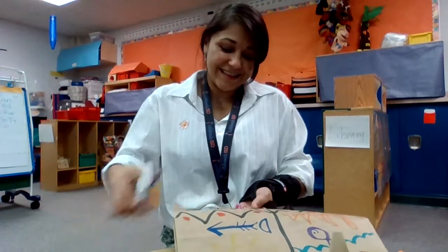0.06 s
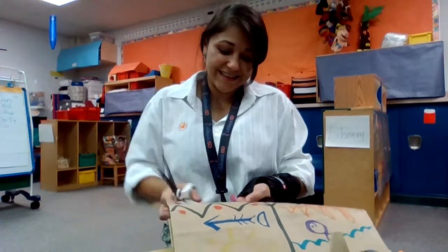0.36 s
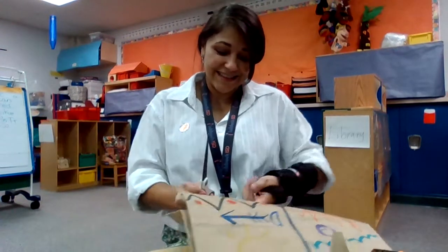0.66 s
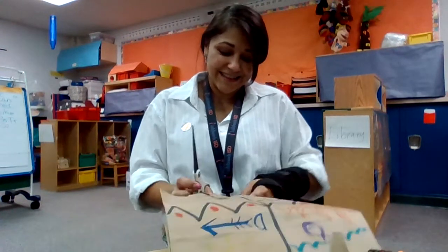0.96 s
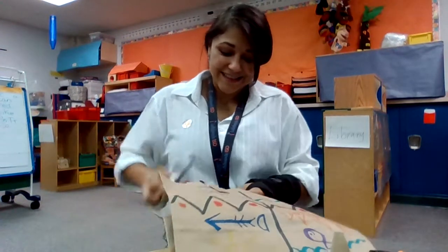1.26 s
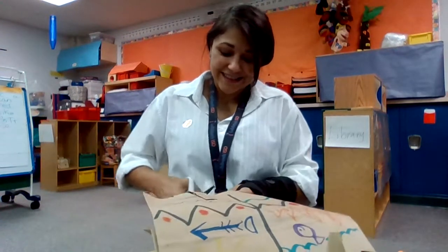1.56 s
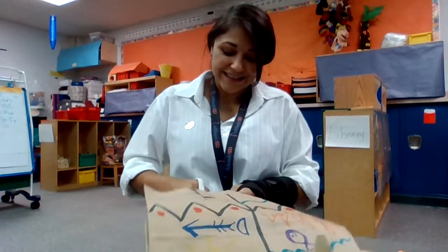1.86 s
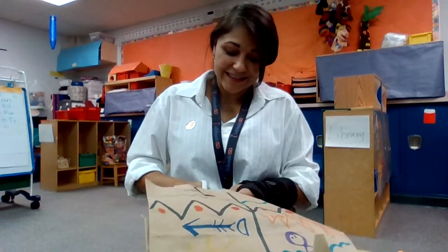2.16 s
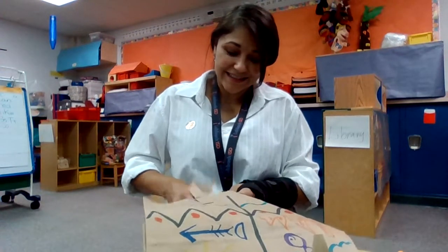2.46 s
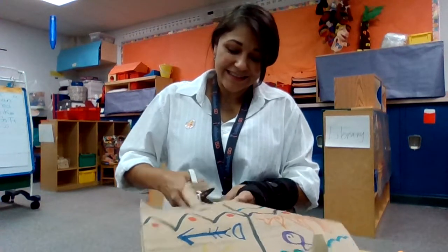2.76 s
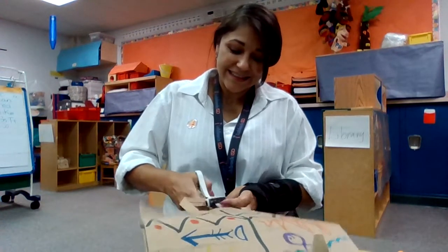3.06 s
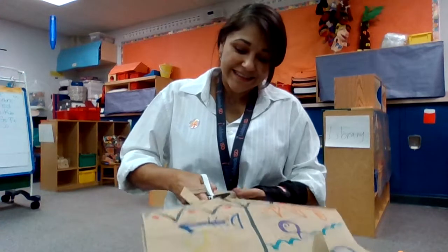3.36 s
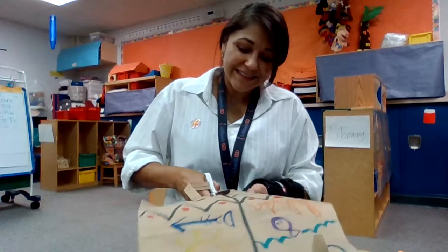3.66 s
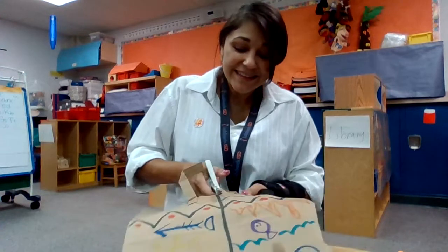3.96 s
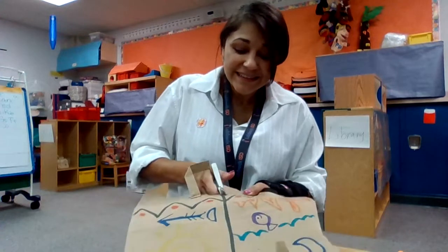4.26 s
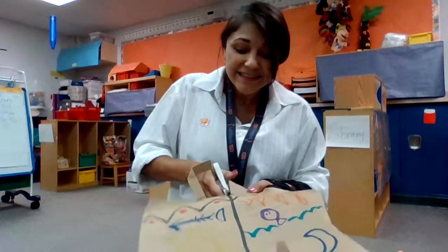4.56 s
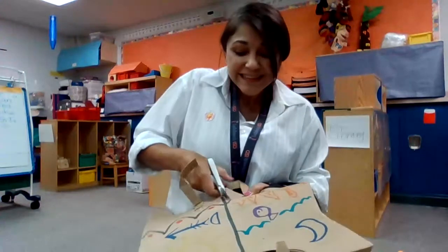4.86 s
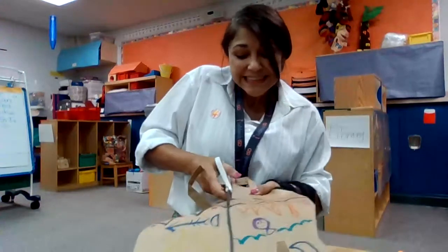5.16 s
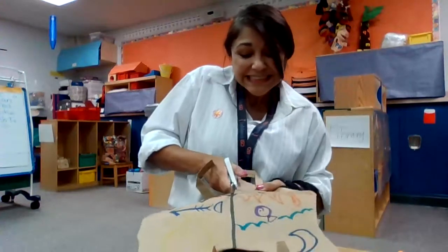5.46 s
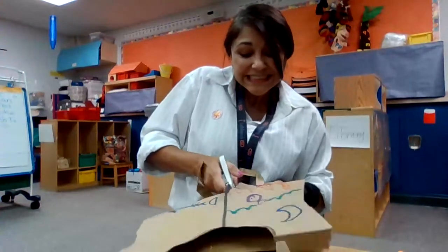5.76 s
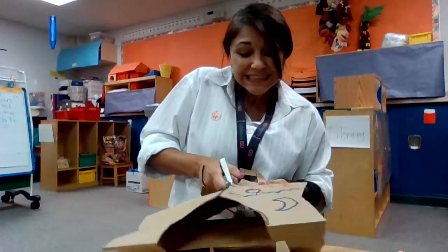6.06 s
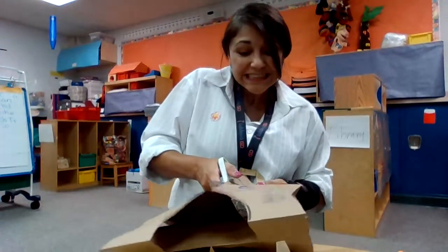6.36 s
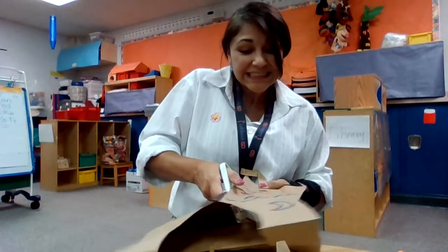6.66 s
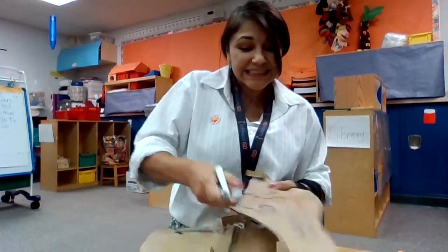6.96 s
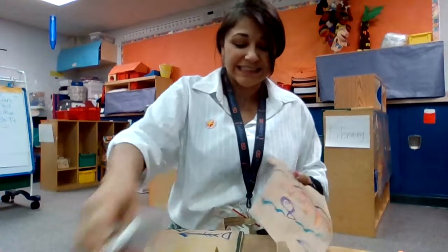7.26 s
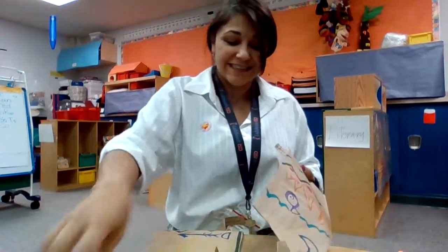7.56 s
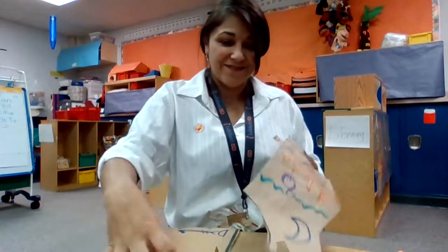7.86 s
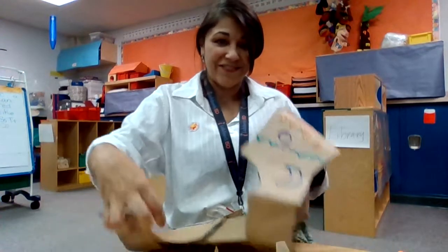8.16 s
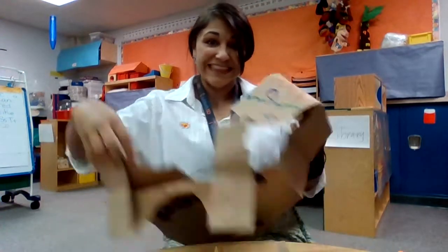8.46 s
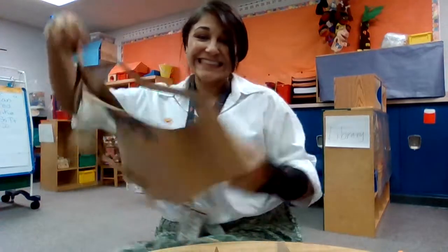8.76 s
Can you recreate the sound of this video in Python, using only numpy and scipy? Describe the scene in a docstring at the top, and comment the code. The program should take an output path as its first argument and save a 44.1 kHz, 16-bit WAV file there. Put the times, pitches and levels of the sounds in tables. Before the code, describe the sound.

A stiff paper bag rustles close to the microphone, sliding, crinkling and buckling with dull pops as it is turned. Scissors cut into it in a run of crunchy, hissing squeezes with sharp snips. They then drop onto a wooden table and bounce with a brief steel ring, and the bag is lifted with a few sharp crackles. Ventilation hums faintly in the quiet classroom.

```python
"""A stiff paper bag rustles close to the microphone in a quiet, carpeted classroom.
As it is turned the paper slides, its creases crinkle and snap, and its panels buckle with dull pops.
Scissors cut in, each squeeze breaking a dense run of fibres, then drop and bounce on the table,
ringing wood and steel. The bag is lifted with a few sharp creases. Ventilation hums faintly behind."""
import sys
import numpy as np
from scipy import signal
from scipy.fft import rfft, irfft
from scipy.io import wavfile

SR = 44100
rng = np.random.default_rng(int(sys.argv[2]) if len(sys.argv) > 2 else 0)


def generate_wav(sig):
    """Save sig (samples, or channels by samples) to the path in sys.argv[1] as 16-bit PCM at SR."""
    pcm = np.round(np.clip(np.atleast_2d(sig).T, -1, 1) * 32767).astype(np.int16)
    wavfile.write(sys.argv[1], SR, pcm)


N = 388080
TIME = np.arange(N) / SR

# room tone: the air's spectrum and the ventilation's tones (frequency [Hz], level [dB])
ROOM_AIR = [(15, -8), (25, 0), (93, 6), (188, -4), (253, 2.5), (421, -9.5), (482, -19), (895, -13),
            (1270, -6), (1660, -8), (3720, -12), (7700, -9.5), (15500, -16)]
VENT_HUM = [(118, -77.5), (240, -79), (415, -80)]
# hard surfaces near the microphone (delay [s], strength [ratio])
NEAR_ECHOES = [(.00085, 0.074), (.0021, -0.055), (.0034, .15), (0.0103, 0.2)]
# faint tones lingering after some contacts (time [s], frequency [Hz], level [dB], t60 [s])
RINGS = [(0.0, 495, -57, 0.41), (3.453, 481, -44, 2.8), (3.457, 1243, -47, 4.7), (4.207, 351, -48.5, 1.6),
         (4.791, 353, -47, 1.4), (7.391, 1296, -49, 0.48)]
# low thuds on the table, from the bag and once from the scissors (time [s], level [dB], centre [Hz])
LOW_THUDS = [(2.091, -41, 130), (2.122, -42.5, 150), (3.057, -48.5, 139), (3.56, -45.5, 160),
             (4.02, -38.5, 146), (4.797, -47, 150), (7.13, -34, 126)]

# scissors landing on the table (time [s], crack level [dB], thud level [dB])
BOUNCES = [(7.129, -4, -6.5), (7.131, -4.5, -15), (7.158, -11, -10.5), (7.173, -18, -9.5), (7.253, -4, -8),
           (7.267, -6, -3.5), (7.27, -10, -8.5), (7.281, -13.5, -29), (7.3089, -5, -9.5), (7.315, -19, -21),
           (7.319, -18, -9.5), (7.327, -7.5, -19), (7.341, -24, -17), (7.351, -12, -14),
           (7.362, -18, -10.5), (7.374, -23, -19), (7.3831, -17, -12.5), (7.405, -25, -14.5)]
# the wooden table's thud with two high steel rings (frequency [Hz], level [dB], t60 [s])
LANDING_MODES = [(111.5, -31.5, 0.48), (140, -27.5, 0.36), (184.3, -33, 0.27), (425, -25.5, 0.085),
                 (560, -23, 0.056), (639, -11, 0.048), (1079, -23, 0.19), (1314, -11, 0.049),
                 (1813, -12.5, 0.047), (1910, -19.5, 0.13), (2150, -10, 0.018), (3380, -19, 0.011),
                 (4600, -22, 0.092), (5430, -37.5, 0.11)]
# the steel blades ringing (frequency [Hz], level [dB], t60 [s])
BLADE_MODES = [(1101, -26.5, 0.17), (2070, -20, 0.049), (3270, -34, 0.08), (4150, -18, 0.043),
               (4700, -29.5, 0.043), (5850, -18, 0.038), (6130, -42, 0.027), (8500, -23, 0.031)]
# scissors rocking to rest (time [s], level [dB], centre [Hz], t60 [s])
SETTLING = (7.385, -27.5, 674, 0.26)

# spectra of the paper, heard close up (frequency [Hz], level [dB])
SLIDE = [(2500, -21), (4200, -8), (5500, -1), (7600, 0), (9500, -1), (12000, -6), (15500, -14.5)]
CRINKLE = [(1000, -17.5), (1650, 1.5), (2100, 4), (2600, 3.5), (3100, 4.5), (4300, 0), (5500, 0.5),
           (9000, -60)]
PANEL = [(300, -24), (450, -12), (640, -3), (850, 5), (1020, 1), (1220, -1.5), (1550, -4), (2400, -22)]
BILLOW = [(30, -16.5), (70, -17), (115, -7), (180, -2), (260, -1.5), (360, 6.5), (520, 5.5), (800, -25.5),
          (1500, -7.5)]
FIBRES = [(2500, -29), (4200, -6.5), (5500, 4), (7400, 7.5), (9500, 4), (12000, 2), (15500, -22.5)]
SIZZLE = [(6000, -9), (9000, -5.5), (12000, 9.5), (14500, 4), (15800, -14.5)]
# panels buckling (time [s], level [dB], pitch [Hz])
POPS = [(.275, -30.5, 1425), (.536, -23, 1360), (.55, -23, 1300), (0.725, -32, 975), (2.088, -18, 746),
        (2.11, -21, 1290), (2.272, -28.5, 860), (2.411, -40, 655), (2.594, -29, 790), (2.688, -41, 734),
        (2.885, -36.5, 880), (3.064, -21, 934), (3.274, -29, 565), (3.457, -26, 1250), (3.906, -13, 927),
        (4.036, -8.5, 1053), (4.076, -11.5, 976), (4.206, -22, 947), (4.33, -32.5, 930), (4.583, -30, 870),
        (4.631, -21, 980), (4.662, -18.5, 1140), (4.815, -15.5, 860), (4.917, -29, 1020),
        (5.075, -22, 1170), (5.143, -22, 970), (6.156, -14, 1490), (6.162, -20.5, 680), (6.552, -14, 1484),
        (6.815, -37, 880), (6.886, -33, 1434), (6.98, -19.5, 1430), (7.038, -40.5, 1440), (7.631, -33, 694),
        (7.676, -27, 1320), (8.008, -30, 1330), (8.203, -30, 1090), (8.215, -37, 250), (8.496, -24, 796),
        (8.504, -18, 430), (8.707, -41, 990)]
# creases and closing blades snapping (time [s], level [dB], centre [Hz])
SNAPS = [(.117, -30.5, 6350), (1.6667, -13, 7200), (2.0601, -14, 9500), (2.0867, -23, 5660),
         (2.1096, -18, 2010), (2.1263, -9, 1830), (3.133, -21.5, 7870), (3.2536, -15.5, 1920),
         (3.947, -14, 7060), (4.02, -11.5, 5300), (4.0345, -7.5, 2440), (4.0743, -1.5, 5150),
         (4.0866, -12.5, 6030), (4.367, -28.5, 3060), (4.4738, -22, 1910), (4.583, -18, 6300),
         (4.6279, -15.5, 2390), (4.659, -15.5, 2650), (4.839, -16.5, 5580), (5.143, -4, 4600),
         (5.526, -14.5, 7860), (5.251, -10, 7300), (5.7382, -9, 3400), (5.7806, -3, 2680),
         (5.7808, -7.5, 6300), (5.947, 0, 6700), (6.003, -14, 2300), (6.226, -3, 4200), (6.2424, -4, 7040),
         (6.446, -12, 5330), (6.5155, 3.5, 5500), (6.5565, 0, 8200), (6.6322, -13.5, 2980),
         (6.655, -12.5, 2840), (6.7413, -22.5, 5100), (6.9344, -20, 3030), (6.949, -18, 1700),
         (6.958, -18, 3620), (6.98, -14, 2640), (7.7125, -22.5, 6160), (8.0083, -19, 3550),
         (8.0675, -18.5, 4300), (8.201, -1, 4970), (8.2015, -15.5, 6030), (8.2045, -7.5, 2360),
         (8.4598, -5, 2260), (8.495, -16, 2380), (8.7022, -19, 3570)]
# faint rustle of the held bag (time [s], level [dB])
HOLDING = [(0, -70), (.25, -51), (.8, -62.5), (1.05, -63.5), (1.2, -65), (1.4, -72), (1.85, -68),
           (2.4, -66.5), (2.7, -52.5), (3.7, -58.5), (4.5, -52.5), (5.0, -60), (6.3, -76), (6.8, -57),
           (7.05, -79), (7.7, -54), (8.35, -69.5), (8.8, -59.5)]
# offsets of that rustle's layers (slide [dB], crinkle [dB], panel [dB], billow [dB])
HOLDING_COLOUR = [-0.5, -9.5, -9.5, -13.5]
# pushes and turns of the bag
# (time [s], swell [s], fade [s], slide [dB], crinkle [dB], panel [dB], billow [dB])
STROKES = [ (.108, 0.016, 0.11, -53, -62, -62, -70), (0.271, 0.15, 0.077, -35, -47.5, -56.5, -68),
           (.505, 0.072, 0.023, -70, -64.5, -37, -52), (0.607, 0.097, 0.074, -30, -39, -56.5, -65),
           (.79, 0.049, 0.018, -48.5, -68.5, -59, -66), (1.295, .008, 0.014, -54, -73, -86, -85),
           (0.964, 0.023, 0.032, -51.5, -56, -48.5, -51), (1.458, 0.056, 0.059, -50, -52.5, -53.5, -85),
           (1.48, 0.1, 0.15, -41, -57.5, -82, -84), (1.635, 0.019, 0.052, -33.5, -48, -60, -66),
           (1.841, 0.057, 0.012, -48.5, -48.5, -42, -72), (1.93, 0.047, 0.13, -52, -56, -61, -78),
           (2.048, 0.021, 0.034, -33, -81, -42, -65), (2.075, 0.018, 0.084, -30.5, -40.5, -31.5, -41.5),
           (2.102, 0.023, .035, -34, -37, -31, -38), (2.136, 0.073, 0.036, -40.5, -42, -46.5, -78),
           (2.24, 0.018, 0.12, -46, -56, -56, -73), (2.43, .08, 0.19, -48.5, -55, -59.5, -81),
           (2.558, 0.052, 0.064, -37.5, -42.5, -49.5, -79), (2.65, 0.11, 0.028, -40, -43, -59, -78),
           (2.769, 0.094, 0.18, -42.5, -43, -60, -81), (2.988, 0.076, 0.07, -40.5, -45, -38, -47.5),
           (3.08, .075, 0.08, -41, -63.5, -74, -71), (3.168, 0.079, 0.039, -31.5, -39.5, -42, -48.5),
           (3.252, 0.042, 0.076, -59, -46.5, -36.5, -38), (3.331, 0.057, 0.17, -41, -51, -52, -57),
           (3.447, 0.13, 0.084, -21, -31, -33.5, -38.5), (3.58, 0.068, 0.069, -34, -36.5, -37.5, -41),
           (3.70, 0.084, 0.035, -49, -55.5, -53, -60), (4.068, 0.023, 0.066, -43, -38, -55, -51),
           (4.178, 0.066, 0.063, -38, -49.5, -45.5, -58), (4.31, 0.07, 0.15, -44, -46.5, -49.5, -51),
           (4.44, 0.076, 0.044, -56, -49.5, -41, -48), (4.573, 0.03, 0.16, -50, -42, -41, -63),
           (4.67, 0.14, 0.066, -25.5, -34.5, -33.5, -50), (4.884, 0.046, 0.082, -44.5, -52.5, -45, -55),
           (5.428, .095, 0.049, -31.5, -49, -45.5, -60), (6.586, 0.058, 0.087, -40, -41, -35.5, -50.5),
           (6.717, 0.023, 0.095, -40.5, -42.5, -51, -48), (6.939, .026, 0.049, -44, -29, -28, -40),
           (7.113, .003, .04, -27, -43, -52, -49), (7.50, 0.067, 0.056, -43, -53, -62, -53),
           (7.62, 0.062, 0.043, -51.5, -53, -50, -49.5), (7.725, 0.059, 0.067, -42.5, -71, -69, -65.5),
           (7.896, 0.016, 0.068, -48, -69, -72, -83), (7.988, 0.026, 0.053, -36, -38, -42.5, -51),
           (8.041, 0.028, 0.21, -49, -44.5, -41, -50.5), (8.183, 0.013, 0.098, -39.5, -32.5, -34, -35.5),
           (8.388, 0.072, 0.12, -38, -39, -42.5, -45), (8.484, 0.019, 0.024, -48, -36.5, -35, -31),
           (8.688, 0.016, 0.085, -55, -38.5, -44, -44), (8.70, 0.09, 0.069, -38, -41, -52, -60)]
# squeezes of the blades
# (time [s], bite [s], length [s], hiss [dB], sizzle [dB], crunch [dB], panel [dB])
SQUEEZES = [ (3.85, 0.035, 0.061, -26.5, -38, -30.5, -34), (3.941, 0.008, 0.045, -27, -43, -29.5, -28),
            (4.003, 0.018, 0.031, -28, -40, -29, -27), (5.037, 0.068, .06, -32, -41, -36, -37),
            (5.105, 0.019, 0.088, -30.5, -39, -33.5, -34), (5.202, 0.024, 0.042, -24.5, -34, -31.5, -36),
            (5.307, 0.058, 0.13, -24, -33, -34.5, -39), (5.603, 0.044, 0.13, -20.5, -24.5, -33, -41.5),
            (5.711, 0.0089, 0.074, -34, -47, -33.5, -36.5), (5.869, 0.043, 0.11, -19, -35, -29, -35.5),
            (5.973, 0.031, 0.06, -30.5, -51, -38.5, -42), (6.053, 0.07, 0.1, -18, -31, -28, -35.5),
            (6.199, 0.018, 0.071, -21, -35, -32.5, -37.5), (6.362, 0.18, 0.12, -16.5, -24.5, -27, -37),
            (6.504, 0.01, 0.069, -26, -35, -30.5, -39)]


def from_db(db):
    """Decibels to gain."""
    return 10 ** (np.asarray(db) / 20)


def unit_power(x):
    """Scale to unit power."""
    return x / np.sqrt(np.mean(x ** 2) + 1e-20)


def add(track, time, sound):
    """Mix a sound in at a time in seconds."""
    start = max(int(time * SR), 0)
    track[start:start + len(sound)] += sound[:N - start]


def drift(rate_hz):
    """Smooth random wander with spread 1."""
    step, run_in = 20, 2000   # samples per point; points skipped
    pole = np.exp(-2 * np.pi * rate_hz * step / SR)
    noise = rng.standard_normal(N // step + run_in + 2)
    slow = signal.lfilter([1], [1, -2 * pole, pole * pole], noise)[run_in:]
    return np.interp(np.arange(N) / step, np.arange(len(slow)), unit_power(slow))


def coloured(x, spectrum, size=2048):
    """Minimum-phase filter through the points of a spectrum; the result has unit power."""
    hz, db = np.transpose(spectrum)
    octave = np.log2(np.maximum(np.arange(size // 2 + 1) * SR / size, 10))
    octaves_outside = np.maximum(np.log2(hz[0]) - octave, 0) + np.maximum(octave - np.log2(hz[-1]), 0)
    gain = from_db(np.interp(octave, np.log2(hz), db) - 20 * octaves_outside)
    cepstrum = irfft(np.log(gain))
    causal = 2 * cepstrum[:size // 2] * (np.arange(size // 2) > 0)
    response = irfft(np.exp(rfft(causal, size)))
    return unit_power(signal.oaconvolve(x, response)[:N])


def resonance(x, hz, q):
    """Two-pole band-pass with gain 1 at its centre."""
    w = 2 * np.pi * min(hz, SR / 3) / SR
    damping = np.sin(w) / (2 * q)
    return signal.lfilter([damping, 0, -damping], [1 + damping, -2 * np.cos(w), 1 - damping], x)


def grains(per_s, spread_db, clump_db, clump_hz):
    """Tiny slips of uneven size that come in clumps; the power is the same at any density."""
    sizes = from_db(spread_db * np.minimum(rng.exponential(1, N), 4)) * rng.choice([-1, 1], N)
    slips = rng.random(N) < per_s / SR
    clumps = from_db(clump_db * np.clip(drift(clump_hz), -2, 2))
    return sizes * slips / np.sqrt(per_s) * clumps


def burst(hz, q, t60, tail_db, tail_t60, size=6000):
    """A sudden release: a spike, a fast decay in a steep-sided resonance and a weaker shiver."""
    t = TIME[:size]
    flutter = rng.choice([-1., 1.], size)
    fade = from_db(-60 * t / t60) + from_db(tail_db - 60 * t / tail_t60)
    spike = .09 * np.exp(-t / .00018)
    dying, steady = resonance(resonance([flutter * (fade + spike), flutter], hz, q), hz, q)
    return dying / np.std(steady)


def room_tone():
    """Quiet air and a slightly unsteady ventilation hum, behind everything else."""
    hum = sum(from_db(db) * np.sqrt(2) * np.sin(2 * np.pi * hz * TIME + drift(.73))
              for hz, db in VENT_HUM)
    return hum + from_db(-67) * coloured(rng.standard_normal(N), ROOM_AIR)


def classroom(x, tail_db, t60, wall_hz, size=26000):
    """The direct sound reaches the microphone first, then dull close reflections and a weak tail."""
    t = TIME[:size]
    tail = rng.standard_normal(size) * from_db(-60 * t / t60) * (t > .012)
    response = from_db(tail_db) * tail / np.linalg.norm(tail)
    for delay, strength in NEAR_ECHOES:
        response[int(delay * SR)] += strength
    response = signal.lfilter(*signal.butter(1, wall_hz, fs=SR), response)
    response[0] = 1   # direct path
    return signal.oaconvolve(x, response / np.linalg.norm(response))[:N]


def lingering_rings(size=45000):
    """Thin tones swell briefly, waver and die away."""
    out, t = np.zeros(N), TIME[:size]
    attack = 1 - np.exp(-t / .0052)
    taper = 1 - (t / t[-1]) ** 2
    for time, hz, db, t60 in RINGS:
        add(out, time, np.sin(2 * np.pi * hz * t) * from_db(db - 60 * t / t60) * attack * taper)
    return out * from_db(1.5 * drift(6))


def low_thuds():
    """Low thuds on the table, from the bag and once from the landing scissors."""
    out = np.zeros(N)
    for time, db, hz in LOW_THUDS:
        add(out, time, from_db(db) * burst(hz, q=1, t60=.19, tail_db=-5, tail_t60=.099, size=9000))
    return out


def settling_handles():
    """The handles rattle out against the wood in a short, hollow drone."""
    out = np.zeros(N)
    time, db, hz, t60 = SETTLING
    add(out, time, from_db(db) * burst(hz, q=3.8, t60=t60, tail_db=-37, tail_t60=.27, size=14000))
    return out


def ringing_blades(size=6000):
    """Every bounce sets the same steel modes ringing, each with a new strength."""
    out, t = np.zeros(N), TIME[:size]
    hz, mode_db, t60 = np.transpose(BLADE_MODES)[:, :, None]
    modes = np.sin(2 * np.pi * hz * t) * from_db(mode_db - 60 * t / t60)
    for time, crack_db, _ in BOUNCES:
        strengths = from_db(crack_db + .83 * rng.standard_normal(len(hz))) * rng.choice([-1, 1], len(hz))
        add(out, time, strengths @ modes)
    return out


def dropped_scissors(size=14000):
    """Each bounce cracks on a new spot, so wood and steel modes vary in strength and a little in pitch."""
    out, t = np.zeros(N), TIME[:size]
    hz, mode_db, t60 = np.transpose(LANDING_MODES)[:, :, None]
    for time, crack_db, thud_db in BOUNCES:
        detune = 1 + .025 * rng.standard_normal(hz.shape)
        modes = np.sin(2 * np.pi * hz * detune * t) * from_db(mode_db - 60 * t / t60)
        strengths = from_db(2 * rng.standard_normal(len(hz))) * rng.choice([-1, 1], len(hz))
        crack = burst(hz=4870, q=.66, t60=.011, tail_db=-25, tail_t60=.26, size=size)
        knock = burst(hz=1100, q=.35, t60=.02, tail_db=-20, tail_t60=.2, size=size)
        thud = strengths @ modes + from_db(-8.5) * knock
        add(out, time, from_db(crack_db - 4.5) * crack + from_db(thud_db - 3.5) * thud)
    return out


def flexing_walls(x, depth, paths=7):
    """Sound bounces inside the bag; as its walls bend, the paths change and the hollow colour shifts."""
    out, now = x.copy(), np.arange(N)
    dulled = signal.lfilter(*signal.butter(1, 9000, fs=SR), x)
    for delay in np.geomspace(.0005, .004, paths):
        lag = delay * SR * (1 + .05 * drift(1))
        strength = depth / np.sqrt(paths) * np.clip(drift(5), -2, 2)
        out += strength * np.interp(now - lag, now, dulled)
    return out / np.sqrt(1 + depth ** 2 / 2)


def panel_pops(size=4000):
    """A panel flips over: a few cycles at its own pitch, then a shiver through the sheet."""
    out, t = np.zeros(N), TIME[:size]
    for time, db, hz in POPS:
        flip = np.sin(2 * np.pi * hz * t) * from_db(-60 * t / .022)
        shiver = from_db(-12) * burst(hz, q=1.16, t60=.082, tail_db=-11, tail_t60=.089, size=size)
        add(out, time, from_db(db) * resonance(flip + shiver, hz, q=1))
    return out


def snaps(t60=.019):
    """Creases give way and the blades click shut: one main resonance over a broad skirt."""
    out = np.zeros(N)
    for time, db, hz in SNAPS:
        core = burst(hz, q=4.9, t60=t60, tail_db=-22, tail_t60=.032)
        skirt = burst(hz, q=.76, t60=t60, tail_db=-38, tail_t60=.07)
        add(out, time, from_db(db) * (from_db(-13.5) * core + from_db(-10) * skirt))
    return out


def stroke_gains(edge_db=23, swell_curve=1.82, fade_curve=1.36):
    """Each push swells and fades over the faint rustle of holding; one gain per layer of the handling."""
    holding_db = np.interp(TIME, *np.transpose(HOLDING))
    power = np.outer(from_db(HOLDING_COLOUR), from_db(holding_db)) ** 2
    for start, swell, fade, *levels_db in STROKES:
        span = slice(max(int((start - swell) * SR), 0), int((start + swell + 3 * fade) * SR))
        t = TIME[span] - start - swell   # zero at the crest
        flank = np.where(t < 0, np.abs(t / swell) ** swell_curve, np.abs(t / fade) ** fade_curve)
        power[:, span] += np.outer(from_db(levels_db), from_db(-edge_db * flank)) ** 2
    return np.sqrt(power)


def bag_handling():
    """Paper slides with a fine hiss, crinkles, and shakes the bag's panels and the air inside."""
    slide, crinkle, panel, billow = stroke_gains()
    friction = grains(per_s=12000, spread_db=3, clump_db=3, clump_hz=47)
    friction += .35 * grains(per_s=70, spread_db=2.5, clump_db=1, clump_hz=10)
    # gentle bending gives lone crinkles, firm bending a dense run
    creases = grains(per_s=500 + 25000 * np.sqrt(crinkle), spread_db=2.5, clump_db=4.5, clump_hz=24.3)
    return (slide * coloured(friction, SLIDE) + crinkle * coloured(creases, CRINKLE)
            + panel * coloured(creases, PANEL) + billow * coloured(friction, BILLOW))


def squeeze_gains(bite_db=30, press_db=2.5, release_db_per_s=648, panel_db_per_s=498, size=16000):
    """The blades bite, press harder and close, and the sheet falls quiet; one gain per layer of the cut."""
    power = np.zeros((4, N))
    for start, bite, length, hiss_db, sizzle_db, crunch_db, panel_db in SQUEEZES:
        t = TIME[:size] - bite
        biting = -bite_db * np.maximum(1 - t / bite, 0) ** 2
        pressing = press_db * (np.minimum(t / length, 1) - .5)
        closed_s = np.maximum(t - length, 0)
        release = release_db_per_s * closed_s
        levels = (hiss_db - release, sizzle_db - release, crunch_db + pressing - release,
                  panel_db + pressing - panel_db_per_s * closed_s)
        for track, db in zip(power, levels):
            add(track, start - bite, from_db(db + biting) ** 2)
    return np.sqrt(power)


def cutting():
    """Fibres break between the blades, now and then a whole bundle; the sheet radiates each break."""
    hiss, sizzle, crunch, panel = squeeze_gains()
    fibres = grains(per_s=4000, spread_db=2.6, clump_db=2.2, clump_hz=160)
    bundles = grains(per_s=170, spread_db=2, clump_db=1, clump_hz=40)
    breaks = fibres + .45 * bundles
    body = coloured(breaks, PANEL) + from_db(-9.5) * coloured(breaks, BILLOW)
    return (hiss * coloured(breaks, FIBRES) + sizzle * coloured(breaks, SIZZLE)
            + crunch * coloured(breaks, CRINKLE) + panel * body)


def scene():
    """Bag and scissors at a classroom table, close to a single microphone."""
    paper = flexing_walls(bag_handling() + cutting(), depth=1.15)
    cracks = flexing_walls(snaps() + panel_pops(), depth=.55)
    impacts = low_thuds() + dropped_scissors() + ringing_blades() + settling_handles()
    direct = paper + cracks + impacts + lingering_rings()
    return (classroom(direct, tail_db=-16, t60=.12, wall_hz=3240) + room_tone())[None]


def record(dry, bass_hz=60, top_hz=16000, ceiling=.8):
    """The small microphone loses deep bass, the highest peaks are rounded and the top is cut."""
    thin = signal.sosfilt(signal.butter(2, bass_hz, "high", fs=SR, output="sos"), dry)
    rounded = ceiling * np.tanh(thin / ceiling)
    return signal.sosfilt(signal.ellip(10, .1, 80, top_hz, fs=SR, output="sos"), rounded)


dry = scene()
out = record(dry)
generate_wav(out)
```